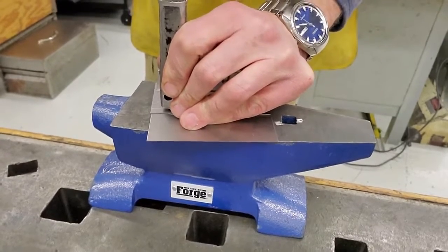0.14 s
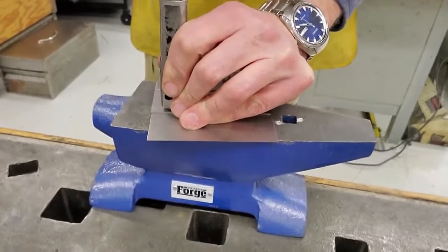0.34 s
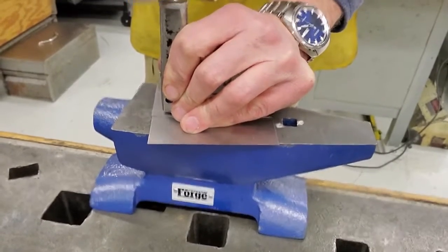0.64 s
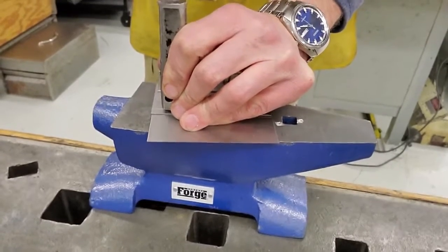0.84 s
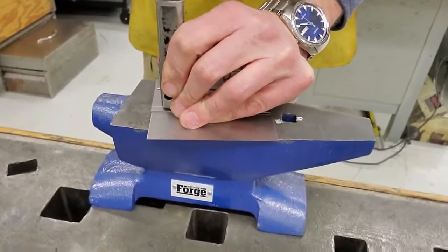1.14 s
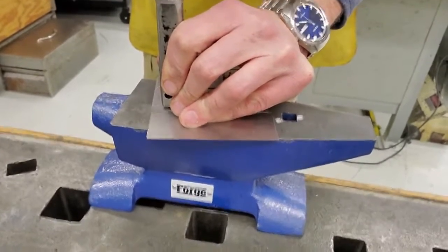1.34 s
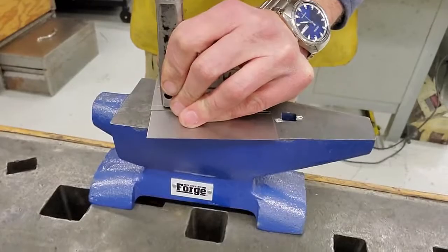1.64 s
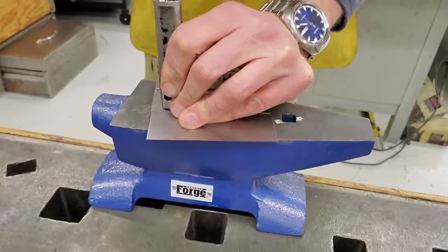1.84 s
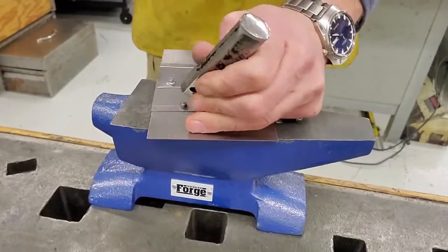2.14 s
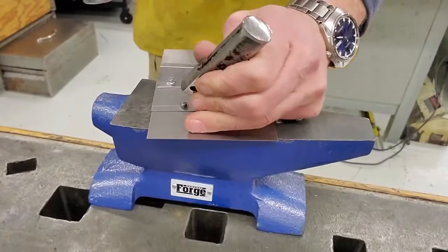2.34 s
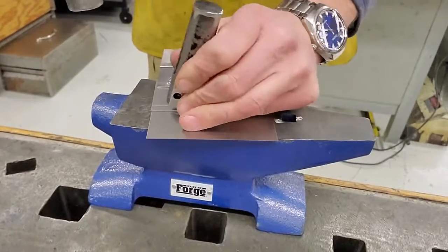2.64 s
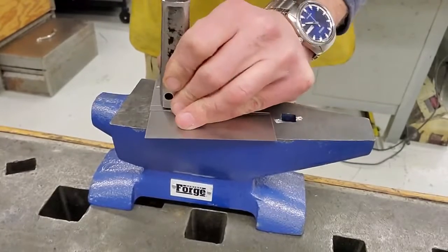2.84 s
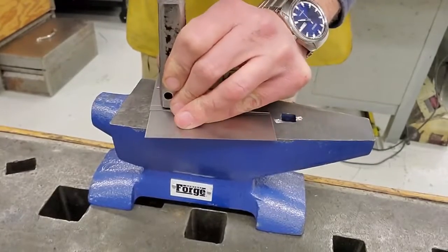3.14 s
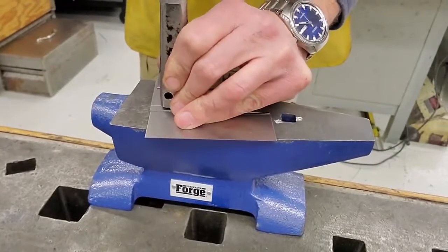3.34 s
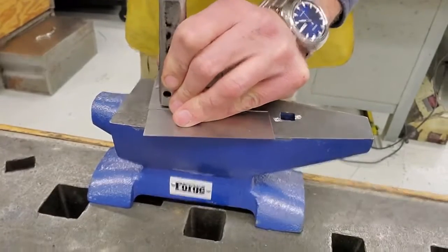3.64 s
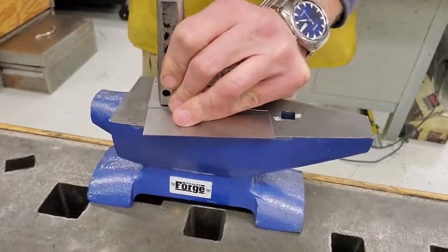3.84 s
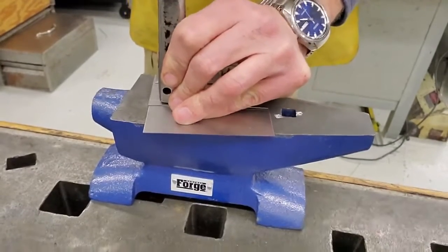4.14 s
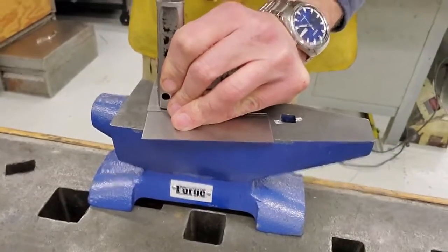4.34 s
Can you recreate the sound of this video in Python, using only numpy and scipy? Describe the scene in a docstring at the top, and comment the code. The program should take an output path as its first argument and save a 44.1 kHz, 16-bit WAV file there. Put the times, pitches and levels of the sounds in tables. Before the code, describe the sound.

Close, loud steel hammering in wide stereo: the tail of one blow, then five regular hard cracks with a dense metallic clank and a splashy room echo. The echo dies away, the tool clicks lightly onto the metal and scrapes faintly, then hammering resumes with a rattly, higher ringing blow, a small rebound tick, and three firmer ones. Quiet low ventilation and mains hum lie beneath, mostly masked by reverberation.

```python
"""A large, hard workshop: a hammer drives a hand-held steel set onto a rivet in sheet metal over a bench anvil.
Each blow sums damped steel modes, a decaying noise crack, slow bench modes and a decaying noise room answer.
Between two groups of blows the set slides and ticks onto the next rivet, where it is loose and rings at first.
Shaped noise and two hum tones make the quiet background."""
import sys
import numpy as np
from scipy import signal
from scipy.fft import rfft, irfft, next_fast_len
from scipy.io import wavfile
from scipy.ndimage import uniform_filter1d

SR = 44100
rng = np.random.default_rng(int(sys.argv[2]) if len(sys.argv) > 2 else 0)


def output_pcm(signal):
    """Save a mono or channel-first signal as 16-bit PCM at the path in sys.argv[1].

    Samples are clipped to [-1, 1] before scaling.
    """
    pcm = np.clip(np.atleast_2d(signal).T, -1, 1) * 32767
    wavfile.write(sys.argv[1], SR, np.round(pcm).astype(np.int16))


N = 197677


def amp(db):
    """Decibels to gain."""
    return 10 ** (np.asarray(db) / 20)


def unit(x):
    """Scale to rms 1."""
    return x / np.sqrt(np.mean(x ** 2) + 1e-20)


def along(points, hz):
    """Interpolate (frequency [Hz], value) points on a log frequency axis."""
    point_hz, value = np.transpose(points)
    return np.interp(np.log(hz + 1), np.log(point_hz + 1), value)


def filtered(x, response):
    """Multiply the spectrum of x by response(hz)."""
    n = x.shape[-1]
    padded = next_fast_len(n + 8192, True)
    spectrum = rfft(x, padded) * response(np.fft.rfftfreq(padded, 1 / SR))
    return irfft(spectrum, padded)[..., :n]


def add(track, start_s, sound):
    """Mix a sound in at start_s, which may lie before the start of the track."""
    start = round(start_s * SR)
    part = sound[:, max(-start, 0):N - start]
    track[:, max(start, 0):][:, :part.shape[1]] += part


def diffuse(n, likeness):
    """White noise at two microphones, with a given likeness at each frequency."""
    def mid_side_gains(hz):
        angle = np.arccos(np.clip(along(likeness, hz), -1, 1)) / 2
        return np.array([np.cos(angle), np.sin(angle)])

    mid, side = filtered(rng.standard_normal((2, n)), mid_side_gains)
    return np.array([mid + side, mid - side])


def renewed(pattern, likeness, share):
    """Keep a stereo noise pattern but replace a share of its power with new noise."""
    share = np.clip(share, 0, 1)
    fresh = diffuse(pattern.shape[1], likeness)
    return np.sqrt(1 - share) * pattern + np.sqrt(share) * fresh


def dying(x, t60_points, size):
    """Decay each frequency at its own rate, frame by frame."""
    hz, t, frames = signal.stft(x, SR, nperseg=size)
    decay = amp(-60 * t / along(t60_points, hz)[:, None])
    return signal.istft(frames * decay, SR, nperseg=size)[1][:, :x.shape[1]]


def ring(modes, t, spread_rad):
    """Damped modes, each reaching the two microphones with phases up to spread_rad apart."""
    phases = rng.uniform(-spread_rad, spread_rad, (len(modes), 1, 1)) * np.array([[.5], [-.5]])
    return sum(amp(db - 60 * t / t60_s) * np.sin(2 * np.pi * hz * t + phase)
               for (hz, db, t60_s), phase in zip(modes, phases))


# room decay: (frequency [Hz], t60 [s])
ROOM_T60 = [(50, 0.65), (130, 1.8), (300, 0.84), (750, 1.517), (1900, 1.47), (3200, 1.266), (5100, 0.86),
            (8000, 0.57), (13500, 0.36)]
# left-right likeness of the reverberant tail and the air: wide in the middle, narrower in bass and treble:
# (frequency [Hz], likeness [-1 to 1])
TAIL_LIKENESS = [(100, .97), (200, .86), (400, .58), (750, .4), (1300, 0), (2400, 0), (4400, 0),
                 (8000, .55), (15000, .7)]


def in_room(x, wet_db):
    """Add reverberation: convolution with decaying noise, which blurs pure tones."""
    n = x.shape[1]
    tail = dying(diffuse(n, TAIL_LIKENESS), ROOM_T60, size=256) / np.sqrt(SR / 10)
    return x + amp(wet_db) * signal.fftconvolve(x, tail, axes=1)[:, :n]


# ventilation spectrum shape: (frequency [Hz], relative density [dB per Hz])
AIR_SPECTRUM = [(25, -20), (60, -9), (130, -9), (250, -13.5), (500, -30.5), (2100, -33), (6500, -49.5),
                (16000, -58.5)]


def workshop():
    """Low ventilation noise and mains hum at 60 Hz and its octave."""
    t = np.arange(N) / SR
    air = unit(filtered(diffuse(N, TAIL_LIKENESS), lambda hz: amp(along(AIR_SPECTRUM, hz))))
    hum = sum(amp(db) * np.sin(2 * np.pi * hz * t) for hz, db in [(60, -63), (120, -72)])
    return amp(-71.0) * air + hum


# left-right likeness of close contact noise: (frequency [Hz], likeness [-1 to 1])
CLOSE_LIKENESS = [(100, .97), (200, .85), (400, .05), (2400, .05), (6000, .25)]
# slides of set on sheet: (peak time [s], dry level [dB], rise [dB/s], tilt [dB/octave])
SLIDE_EVENTS = [(2.785, -52.5, 136, -3), (3.27, -67, 60, -1)]
SLIDE_FALL_DB_PER_S = 195
# scrape spectrum shape before tilt: (frequency [Hz], relative density [dB per Hz])
SCRAPE_SPECTRUM = [(100, -25), (300, -7), (700, -10), (2000, 5), (4500, 1), (7500, -16), (12000, -4),
                   (15500, -5)]


def sliding():
    """The set scrapes faintly on the sheet: gritty noise with a swell and a quick stop."""
    out, t = np.zeros((2, N)), np.arange(N) / SR
    for peak_s, db, rise_db_per_s, tilt_db in SLIDE_EVENTS:
        grit = diffuse(N, CLOSE_LIKENESS) * rng.exponential(size=N)
        scrape = unit(filtered(grit, lambda hz: amp(along(SCRAPE_SPECTRUM, hz) + tilt_db * np.log2(hz + 200))))
        swell_db = np.minimum(rise_db_per_s * (t - peak_s), SLIDE_FALL_DB_PER_S * (peak_s - t))
        out += scrape * amp(db + swell_db)
    return in_room(out, wet_db=-4.5)


# colour change at looseness 1: (frequency [Hz], gain [dB])
LOOSE_COLOUR = [(200, -6.5), (1000, -1.5), (2000, -6), (2600, -8), (3400, -3), (4400, 11), (5800, 3.5),
                (7500, 2.5), (12000, 4), (15000, -6)]


def contact_colour(hz, treble_db, loose):
    """Contact gain [dB]: harder is brighter; a loose set moves the weight of the sound up."""
    treble_shelf = hz ** 2 / (hz ** 2 + 7000 ** 2)
    return loose * along(LOOSE_COLOUR, hz) + treble_db * treble_shelf


# light contacts, as the set is put down, rattles or rebounds:
# (time [s], level [dB], treble shelf [dB], relative ring level [dB], favoured frequency [Hz])
LIGHT_TAPS = [(2.7018, -25.5, 0, -4, 3950), (2.7132, -27, 3, -3, 2030), (2.757, -39, -5, -2, 1450),
              (2.797, -33.5, -9, 4, 1350), (3.3797, -4, -22, -3, 1700)]
# loosely seated set and sheet, undamped by fingers: (frequency [Hz], relative level [dB], t60 [s])
LOOSE_MODES = [(268, -8, .5), (474, -10, .4), (598, -10, .45), (1425, -7, .28), (1590, -10, .2),
               (1680, -10, .25), (2030, -6, .15), (2035, -12.5, .7), (3470, -19, .15), (3960, -14, .17),
               (4320, -15, .35), (4570, -13, .35), (5320, -14, .3), (6270, -19, .15)]
FAVOUR_DB, FAVOUR_OCTAVES = 8, 0.5  # lift and reach around the favoured frequency
# contact crack spectrum: (frequency [Hz], relative density [dB per Hz])
CRACK_SPECTRUM = [(30, -15.5), (120, -8), (400, -3.5), (1500, -7.5), (3000, -4), (4800, -7.5), (6300, -3.5),
                  (7400, -10), (10300, -10.5), (11400, -6.5), (13000, -1.5), (14300, -3.5), (15700, -7)]
# contact crack decay: (frequency [Hz], t60 [s])
CRACK_DECAY = [(100, 0.038), (2000, 0.062), (6000, 0.028), (13000, 0.015)]


def light_contacts():
    """A noise tick and a short finger-damped ring; each touched spot favours some modes."""
    out, t = np.zeros((2, N)), np.arange(3 * SR // 4) / SR
    fingers = amp(-60 * t / .11)
    attack = 1 - np.exp(-t / 0.0007)
    for start_s, db, treble_db, ring_db, spot_hz in LIGHT_TAPS:
        def tick_gain(hz):
            return amp(along(CRACK_SPECTRUM, hz) + contact_colour(hz, treble_db, loose=0.4))

        def favour_db(hz):
            return FAVOUR_DB * np.exp(-(np.log2(hz / spot_hz) / FAVOUR_OCTAVES) ** 2)

        tick = dying(filtered(diffuse(len(t), CLOSE_LIKENESS), tick_gain), CRACK_DECAY, size=64)
        modes = [(hz, mode_db + favour_db(hz), t60_s) for hz, mode_db, t60_s in LOOSE_MODES]
        damped_ring = fingers * ring(modes, t, spread_rad=np.pi * 3 / 4)
        tap = (tick + amp(ring_db - 16.0) * damped_ring) * attack
        add(out, start_s, amp(db) * in_room(tap, wet_db=-7))
    return out


# hammer blows: (time [s], level [dB], treble shelf [dB], zing [Hz])
HAMMER_BLOWS = [(-.055, 0.5, 0.5, 11900), (0.3141, 0.5, 0.5, 11400), (.6812, 1, 2.5, 12900),
                (1.045, 0.5, 2, 13400), (1.4142, 1, 0.5, 12100), (1.7916, 0.5, 2.5, 11900),
                (3.3201, -1, 0, 13100), (3.6925, 1.5, -2.5, 14600), (4.039, .5, -0.5, 13000),
                (4.3766, 2, -2.5, 12800)]
MOVED_S = 2.7  # set moved to the next rivet
FIRST_LOOSENESS, LOOSENESS_KEPT = 0.62, .14  # start value (0-1), share left after each blow


def looseness(time_s):
    """The set sits loosely on a new rivet; each blow since the move seats it more firmly."""
    earlier = sum(MOVED_S < blow[0] < time_s for blow in HAMMER_BLOWS)
    return FIRST_LOOSENESS * LOOSENESS_KEPT ** earlier * (time_s > MOVED_S)


# set, sheet and anvil pressed together: (frequency [Hz], width [Hz], relative level before width scaling [dB])
STEEL_MODES = [(564, 210, -6), (1022, 26, -1), (1556, 83, 1), (2040, 97, 1), (2800, 900, -14),
               (3597, 40, -1.5), (4025, 87, -6.5), (5190, 290, -24), (5750, 37, -8.5), (5950, 330, -15.5),
               (7060, 49, -24.5), (9270, 87, -26), (9160, 150, -21), (11430, 110, -8.5),
               (12500, 170, -14.5), (13300, 150, -17), (14100, 530, -16.5), (15300, 170, -14.5)]


def steel_colour(hz):
    """Gain that makes the steel's resonances stand out a little in the room's answer."""
    depth = 0.73
    power = sum(1 / (1 + (2 * (hz - mode_hz) / width_hz) ** 2) for mode_hz, width_hz, _ in STEEL_MODES)
    return np.sqrt((1 + depth * power) / (1 + depth / 4))


# bench under the anvil: (frequency [Hz], relative level [dB], t60 [s])
BENCH_MODES = [(42.8, -29, .6), (63.3, -22.5, 0.18), (79.64, -20.5, 0.53), (159.3, -32, .4),
               (232, -42.5, 0.77), (546, -40.5, .7), (590, -33.5, .72)]
THUMP_DB, LOOSE_THUMP_DB = -3.5, 2.5  # bench gain when seated, rise at looseness 1
# lengthwise ring of the set: (frequency [Hz], relative level [dB], t60 [s])
LENGTHWISE_MODE = [(11290, -35.5, .14)]
# room answer spectrum: (frequency [Hz], relative density [dB per Hz])
HALL_SPECTRUM = [(30, -20.5), (120, -14.5), (300, -14.5), (550, -16), (900, -16.5), (1500, -14.5),
                 (2050, -18), (2400, -20), (3000, -18), (4500, -23), (6000, -25), (7400, -28), (10500, -28),
                 (11500, -22), (15500, -27)]
ZING_DB, ZING_WIDTH_HZ = 4, 330  # high resonance of the contact


def hammering():
    """Blows on nearly the same spot excite steel, bench and room with only small changes."""
    out, t = np.zeros((2, N)), np.arange(3 * SR // 2) / SR
    brief = t[:SR // 10]
    clank = np.zeros((2, len(brief)))
    for k, (hz, width_hz, db) in enumerate(STEEL_MODES):
        t60_s = np.log(1000) / np.pi / width_hz
        clank += amp(-51) * (-1) ** k * width_hz * ring([(hz, db, t60_s)], brief, spread_rad=2.0)
    thump = ring(BENCH_MODES, t, spread_rad=np.pi / 10) * (1 - np.exp(-t / 0.011))
    ping = in_room(ring(LENGTHWISE_MODE, t, spread_rad=np.pi), wet_db=3)
    loose_ring = in_room(amp(-21.5) * ring(LOOSE_MODES, t, spread_rad=2.2), wet_db=-1.5)
    crack_pattern = diffuse(len(brief), CLOSE_LIKENESS)
    hall_pattern = diffuse(len(t), TAIL_LIKENESS)
    contact_attack = 1 - np.exp(-(brief / 0.0012) ** 2)
    hall_attack = 1 - np.exp(-(t / 0.012) ** 2)  # the walls answer a moment later

    for start_s, db, treble_db, zing_hz in HAMMER_BLOWS:
        loose = looseness(start_s)
        crack = renewed(crack_pattern, CLOSE_LIKENESS, share=0.54)
        crack = filtered(crack, lambda hz: amp(along(CRACK_SPECTRUM, hz)))
        hall = renewed(hall_pattern, TAIL_LIKENESS, share=.2)
        hall = filtered(hall, lambda hz: amp(along(HALL_SPECTRUM, hz)) * steel_colour(hz))
        blow = dying(hall, ROOM_T60, size=256) * hall_attack
        blow[:, :len(brief)] += (clank + dying(crack, CRACK_DECAY, size=64)) * contact_attack

        def blow_gain(hz):
            # the zing's pitch differs from blow to blow
            zing = ZING_DB * np.exp(-((hz - zing_hz) / ZING_WIDTH_HZ) ** 2)
            return amp(contact_colour(hz, treble_db, loose) + zing)

        blow = filtered(blow + ping, blow_gain)
        bench = amp(THUMP_DB + loose * LOOSE_THUMP_DB) * thump
        add(out, start_s, amp(db) * (blow + bench + loose * loose_ring))
    return out


# stereo lean of the steel sounds: (frequency [Hz], left minus right [dB])
STEREO_LEAN = [(100, -1.6), (270, 0), (700, -0.8), (2400, 0.5), (4400, -4), (8000, 0), (14000, 0.3)]


def scene():
    """Riveting over the workshop background; some bands of the riveting lean to one microphone."""
    steel = hammering() + light_contacts() + sliding()
    leaning = filtered(steel, lambda hz: amp(along(STEREO_LEAN, hz) * np.array([[.5], [-.5]])))
    return leaning + workshop()


TOP_HZ = 15750


def record(dry):
    """Turn quiet passages down, round off the highest peaks and cut steeply above TOP_HZ."""
    power = uniform_filter1d(np.mean(dry ** 2, axis=0), size=SR // 25)
    level_db = 10 * np.log10(np.abs(power) + 1e-12)
    hushed = dry * amp(np.interp(level_db, [-63, -46], [-6, 0]))
    rounded = hushed / (1 + np.abs(hushed) ** 6) ** (1 / 6)
    return filtered(rounded, lambda hz: 1 / np.sqrt(1 + (hz / TOP_HZ) ** 160))


dry = scene()
out = record(dry)
output_pcm(out)
```